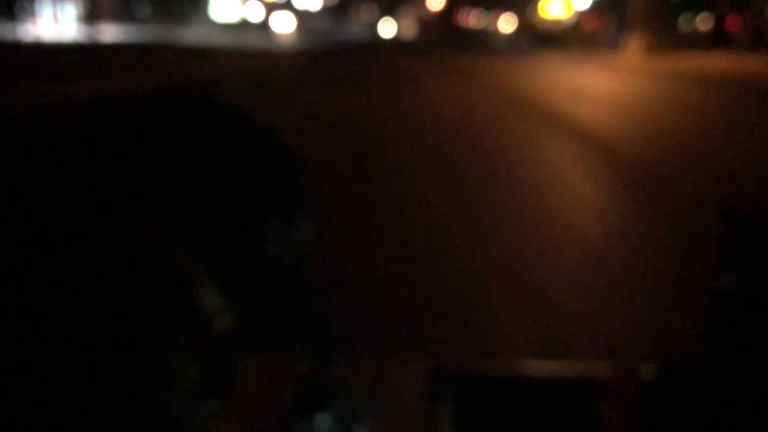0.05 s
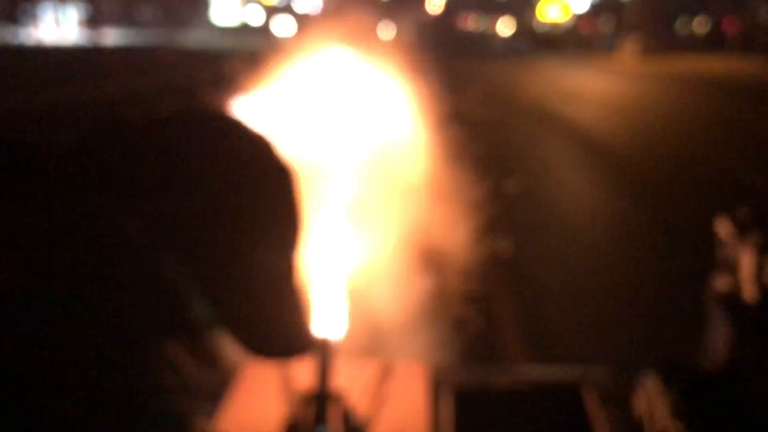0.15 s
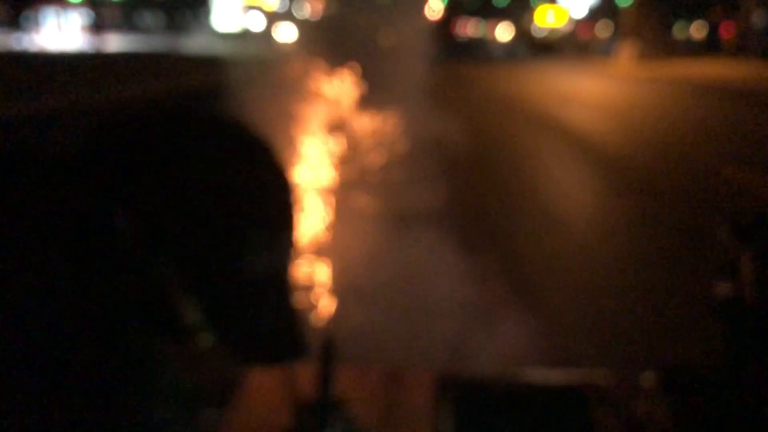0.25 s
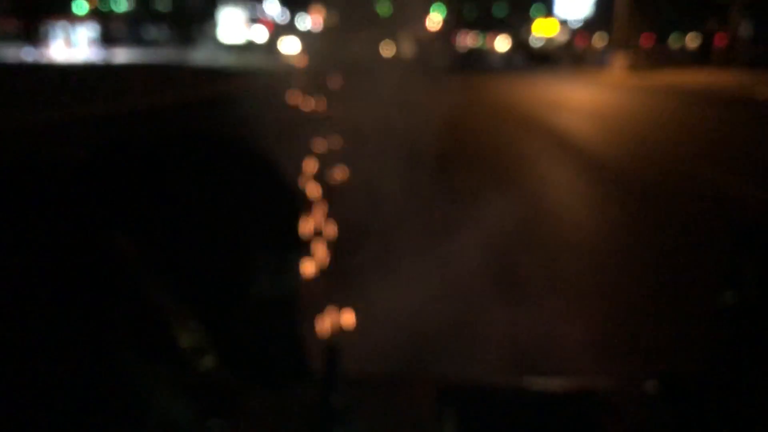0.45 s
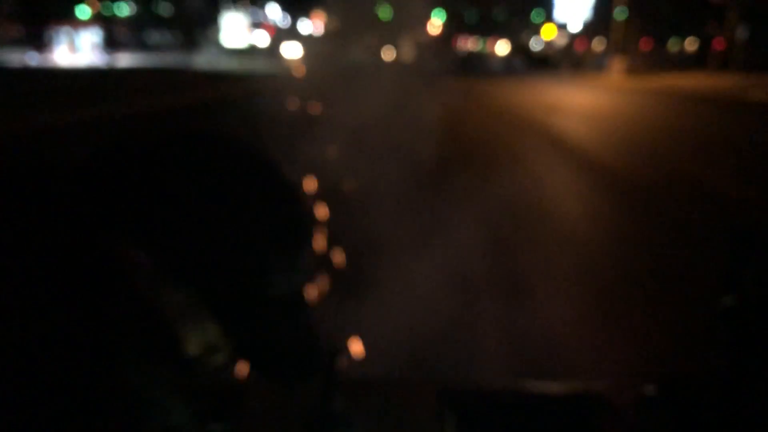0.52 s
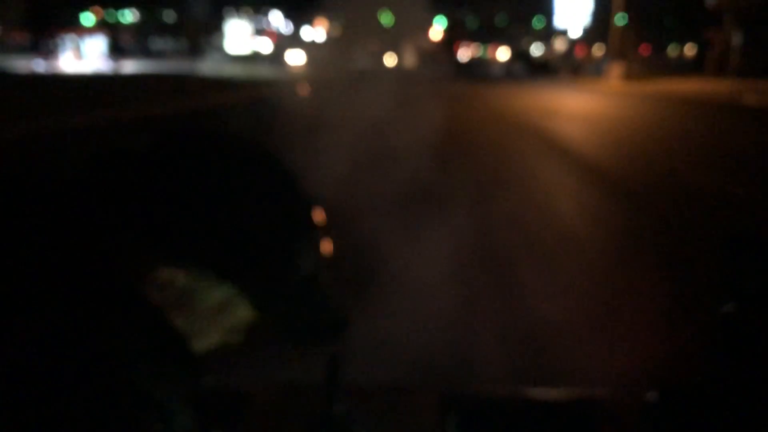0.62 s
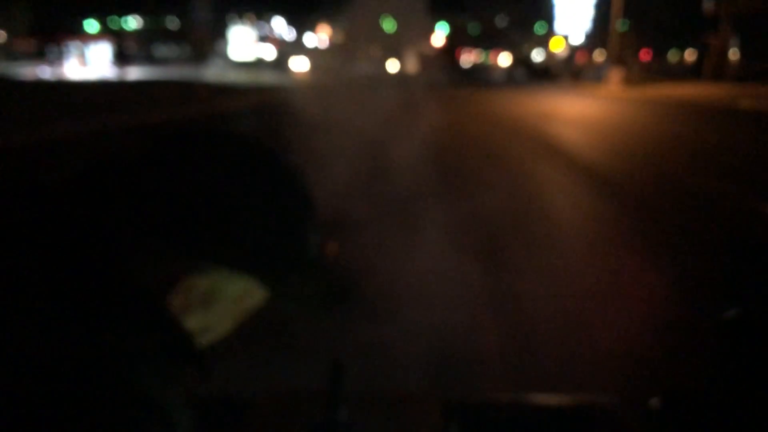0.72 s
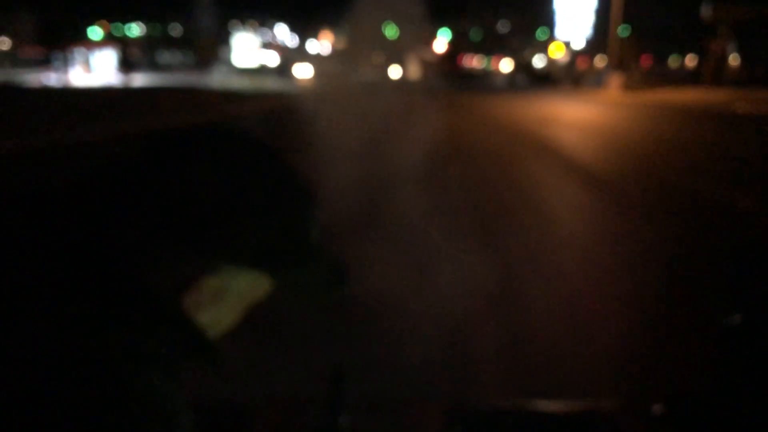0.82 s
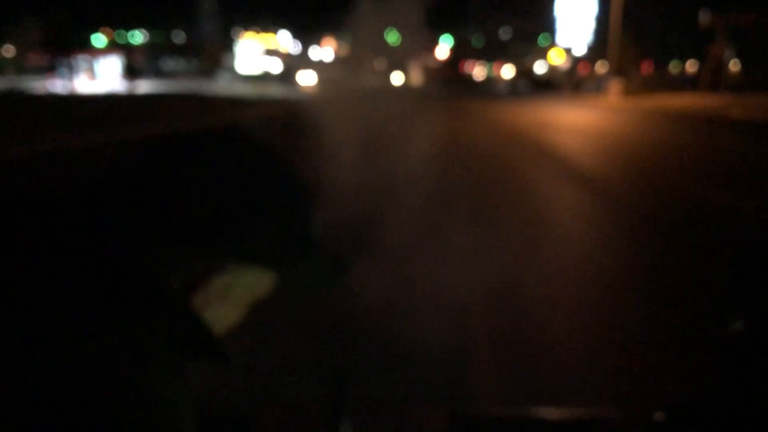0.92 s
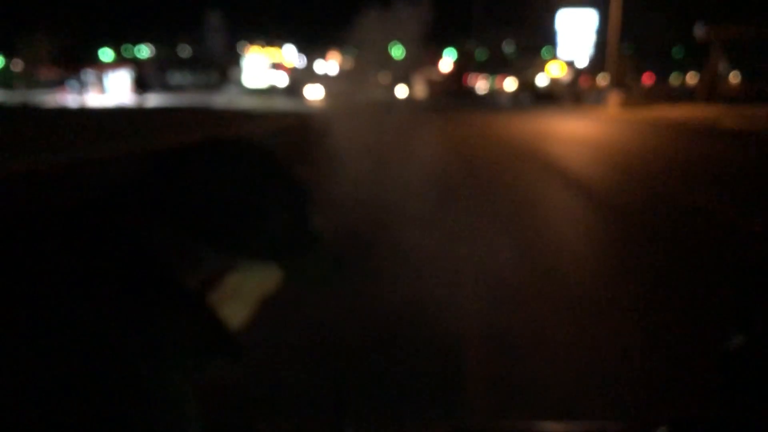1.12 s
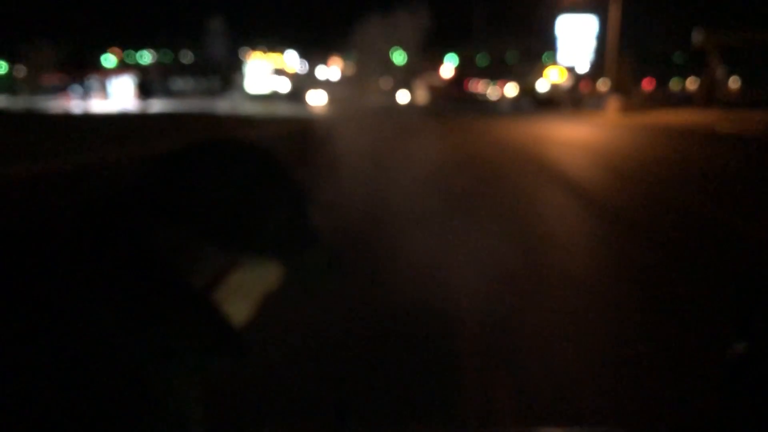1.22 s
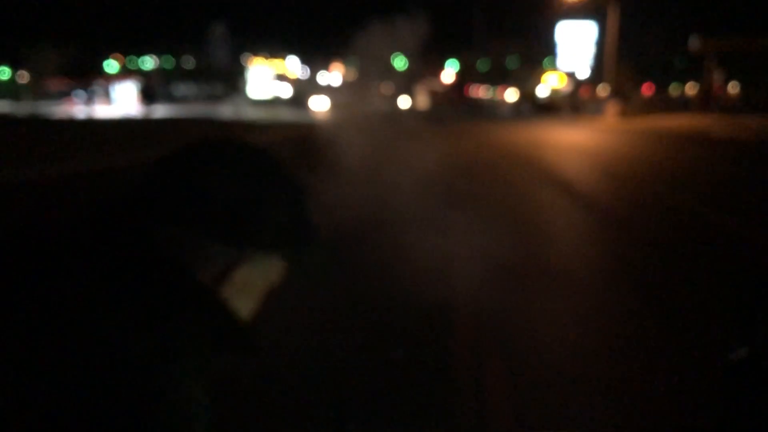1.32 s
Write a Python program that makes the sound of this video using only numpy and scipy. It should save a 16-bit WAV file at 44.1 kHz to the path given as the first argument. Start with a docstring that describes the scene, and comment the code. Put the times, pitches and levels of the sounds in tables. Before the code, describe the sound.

A small cannon fires one loud, close blast outdoors at night, with crackling echoes and rumble.

```python
"""A small black-powder cannon fires upward over open ground at night, close to the microphone.
Shaped noise makes its flare, roar and crack, and the jet of flame that hisses out with popping grains.
Buildings near and far send back sharp slaps (filtered clicks), a crackle and a rolling rumble (noise swells),
over the noise hum of a distant town. Low notes lag the high ones, so every slap is a quick downward chirp."""
import sys
import numpy as np
from scipy import signal
from scipy.fft import rfft, irfft
from scipy.io import wavfile

SR = 44100
rng = np.random.default_rng(int(sys.argv[2]) if len(sys.argv) > 2 else 0)


def transcribe(u):
    """Save the signal u as a 16-bit wav file named by the first command-line argument.

    u: samples, shape (n,) or (channels, n), limited to [-1, 1]; the rate is SR.
    q: integer samples, one column per channel.
    """
    v = np.clip(np.atleast_2d(u).T, -1, 1)
    q = np.round(v * 32767).astype(np.int16)
    wavfile.write(sys.argv[1], SR, q)


N = 59535  # length [samples]

# Noise spectrum of the distant town: (frequency [Hz], level [dB per Hz])
TOWN_SPECTRUM = [(25, -30.5), (60, 2.5), (110, 1), (210, -3.5), (330, -14), (550, -11.5), (850, -19),
                 (1400, -20), (2200, -35), (4000, -46.5), (8000, -67), (16000, -78)]
# Noise spectra of the flame, its hiss and its boom: (frequency [Hz], level [dB per Hz])
JET_SPECTRUM = [(300, -15), (1500, -15.5), (3000, -13.5), (5000, 1), (8000, 0.5), (12000, -1.5), (16000, 1)]
BOOM_SPECTRUM = [(25, -43), (45, -16), (64, 0.5), (100, 1), (160, 3.5), (280, 1), (400, -21), (600, -5.5),
                 (850, -14), (1250, -17.5), (2000, -20), (4000, -26.5), (10000, -55)]
# Noise spectra of the charge, its roar and its crack: (frequency [Hz], level [dB per Hz])
ROAR_SPECTRUM = [(100, -30.5), (300, -6.5), (450, -2.5), (650, 6.5), (800, -7.5), (1000, -4.5),
                 (1250, -7.5), (1600, 1.5), (2200, -8.5), (3050, -8.5), (3600, -39), (8000, -57.5)]
CRACK_SPECTRUM = [(200, -25.5), (1000, 1.5), (2500, 0.5), (4500, 0.5), (6500, 0), (8500, -6), (11000, -3),
                  (16000, -12.5)]
# Filter that turns one click into the thump: (frequency [Hz], gain [dB])
THUMP_RESPONSE = [(25, 14), (55, 27.5), (90, 24), (200, 24), (450, 31), (700, 22.5), (1200, 19.5),
                  (4000, -6)]
# Spectrum of the popping powder grains: (frequency [Hz], level [dB per Hz])
EMBER_SPECTRUM = [(200, -9.5), (600, 1.5), (1200, -3), (2500, -12), (5000, -18.5), (12000, -29)]
# Filter shared by every slap off a building: (frequency [Hz], gain [dB])
SLAP_RESPONSE = [(25, -5.5), (70, 28), (130, 37), (250, 42), (550, 38.5), (950, 21.5), (1450, 26.5),
                 (2200, 27.5), (3200, 27.5), (5000, 25.5), (9000, 19.5), (16000, 7.5)]
# Centres of the bass, middle and treble bands of a slap: (frequency [Hz])
SLAP_CENTRES_HZ = [320, 1213, 10200]
# Slaps from buildings: (time [s], middle gain [dB], bass gain [dB], treble gain [dB],
# favoured frequency [Hz], smear relative to click [dB])
BUILDING_ECHOES = [(0.2716, -20.5, -45, -59, 980, -11), (0.2861, -25.5, -21, -70, 990, -8),
                   (0.301, -32.5, -21, -43, 1170, 0), (0.3623, -23, -41, -46, 1110, 0),
                   (0.383, -31.5, -45, -35.5, 2640, 3), (0.3946, -33, -41, -44, 1780, -1),
                   (0.4094, -31, -51.5, -49, 1110, -1), (0.4214, -42, -31.5, -31.5, 1230, 18),
                   (0.4251, -20.5, -33.5, -65, 1340, 4), (0.4388, -35.5, -38, -53, 3140, -6),
                   (0.474, -41, -59, -59, 1310, -14), (0.4995, -56, -35, -40, 1780, -3),
                   (0.5037, -32, -26.5, -54, 1280, -10.5), (0.5134, -37, -20.5, -43, 1300, -8),
                   (0.5332, -31, -25.5, -48, 2550, -1), (0.5511, -48, -28, -52, 2380, 26),
                   (0.595, -39, -40.5, -55, 1590, 0), (0.6126, -34.5, -37, -57, 1210, 1),
                   (0.6475, -28, -91, -49, 1130, -1.5), (0.7008, -32.5, -36.5, -53.5, 1000, -1.5),
                   (0.7065, -37, -35, -47.5, 1280, -4), (0.7405, -42.5, -54, -49.5, 1560, -20),
                   (0.8006, -40.5, -32.5, -66, 1540, -16), (0.8367, -41, -35.5, -73, 1640, -14),
                   (0.9329, -25, -28, -54, 1514, -6), (1.0585, -40, -47.5, -77.5, 1270, -5.5),
                   (1.0825, -46, -45.5, -81, 1130, -1.5), (1.11, -38.5, -51.5, -93, 1334, -7.5),
                   (1.1361, -30.5, -79, -74, 1130, -1), (1.1512, -37, -73, -79, 1585, 1.5),
                   (1.1653, -36, -65, -85, 1190, 0), (1.216, -40, -65, -81, 1284, 7),
                   (1.2637, -52.5, -48.5, -77.5, 1540, 3.5), (1.3288, -38, -53.5, -77, 1090, -8)]
# Spectrum of the small scattered reflections: (frequency [Hz], level [dB per Hz])
SCATTER_SPECTRUM = [(60, -6), (250, 4.5), (500, -9.5), (850, -12.5), (1400, -6), (2200, -13), (3200, -14.5),
                    (5000, -25.5), (8000, -28.5), (12000, -40.5), (16000, -28)]
# How fast the scattered reflections die, band by band: (band centre [Hz], fall [dB per s])
SCATTER_DECAY = [(100, 12), (500, 5), (1500, 11), (3500, 20), (7000, 42.5), (14000, 58)]
# Noise spectra from far blocks, low body, grainy top and last rumble: (frequency [Hz], level [dB per Hz])
ROLL_SPECTRUM = [(60, -35), (150, 1), (230, 3), (340, 1), (450, -11), (600, -5.5), (900, -37), (3000, -68)]
SIZZLE_SPECTRUM = [(700, -23), (1400, 11), (2200, -3), (3000, 4), (4200, -9), (6000, -16), (9000, -27),
                   (16000, -36)]
RUMBLE_SPECTRUM = [(25, -36), (45, -8), (65, 17), (90, 9), (140, -5), (300, -21), (1000, -72)]
# Long low echoes from far blocks: (time [s], hold [s], low body level [dB], sizzle level [dB])
FAR_ROLLS = [(0.521, 0.039, -39.5, -54.5), (.695, 0.023, -41.5, -51.5), (0.787, 0.028, -46.5, -53.5),
             (.845, 0.021, -39.5, -70), (0.889, 0.044, -38, -55.5), (1.095, 0.0086, -41, -65)]

# RISE is the e-fold time of an onset, T60 the time of a 60 dB fall
FLARE_S, ROAR_S, CRACK_S, THUMP_S = .190, 0.2007, .2112, .2238  # stages of the shot
TOWN_DB, HISS_DB = -42, -77.5
JET_DB, JET_HOLD_S, JET_T60_S = -37.5, 0.11, 0.36
JET_FLUTTER_DB, JET_FLUTTER_PER_S, JET_FLUTTER_HZ = -1, 320, 5000  # the flame sputters below this frequency
BOOM_DB, BOOM_HOLD_S, BOOM_T60_S = -29, 0.11, 0.45
SUB_HZ, SUB_DB, SUB_HOLD_S, SUB_T60_S = 64.16, -34.5, .115, 0.11
ROAR_DB, ROAR_RISE_S, ROAR_HOLD_S, ROAR_T60_S = -10, 0.0036, 0.0091, .04
SURGE_S, SURGE_DB, SURGE_HOLD_S = 0.222, -15.5, 0.0043  # a second push of gas behind the crack
CRACK_DB, CRACK_HOLD_S, CRACK_T60_S = -14.5, 0.014, 0.025
EMBER_DB, EMBERS_PER_S, EMBER_HOLD_S, EMBER_T60_S = -36.5, 230, 0.081, 0.45
FACADE_HOLD_S, FACADE_T60_S = 0.0045, 0.015  # the rough front of a building smears each slap
RING_DB, RING_OCTAVES = 10, 0.29  # each building favours one band
SCATTER_S, SCATTER_DB, SCATTER_PER_S, SCATTER_SPREAD_DB = .5, -44, 1500, 2
SCATTER_PATCHY_DB, SCATTER_PATCHES_PER_S = 1, 33  # reflections come in clumps, band by band
SIZZLE_GRAIN_DB, SIZZLE_GRAINS_PER_S = 5, 200
RUMBLE_S, RUMBLE_DB, RUMBLE_HOLD_S = 0.91, -45.5, 0.15
SPARK_S, SPARK_HZ, SPARK_OCTAVES_PER_S = .672, 12800, -8
SPARK_LENGTH_S, SPARK_WIDTH_HZ, SPARK_DB, SPARK_FLICKER_DB = 0.018, 1900, -69, 6
LAG_CYCLES, LAG_KNEE_HZ = 2.2, 15  # well above the knee, each frequency is late by this many periods
CEILING, LOW_CUT_HZ, TOP_HZ = 0.64, 37, 16000  # ceiling in full scale


def undb(db):
    """Decibels to gain."""
    return 10 ** (np.asarray(db) / 20)


def along(hz, points):
    """Read a table of (frequency [Hz], value) on a log-frequency axis."""
    f, v = np.array(points, float).T
    return np.interp(np.log(hz + 1e-9), np.log(f), v)


def bins():
    """Frequencies of the padded spectrum [Hz]."""
    return np.arange(N + 1) * SR / (2 * N)


def filtered(x, response):
    """Apply a frequency response, with the sound mirrored at its end."""
    mirrored = np.concatenate([x, x[::-1]])
    return irfft(rfft(mirrored) * response)[:N]


def coloured(x, spectrum):
    """Give a sound a spectrum and an rms of 1."""
    y = filtered(x, undb(along(bins(), spectrum)))
    return y / np.sqrt(np.mean(y ** 2))


def noise(spectrum):
    """Turbulent noise of rms 1."""
    return coloured(rng.standard_normal(N), spectrum)


def envelope(start, rise, hold, t60):
    """Exponential rise up to the start, hold, exponential release."""
    t = np.arange(N) / SR - start
    onset = np.minimum(t, 0) / rise
    release = np.log(1000) * np.maximum(t - hold, 0) / t60
    return np.exp(onset - release)


def pulse(at):
    """A pressure click one sample long."""
    return 1. * (np.arange(N) == int(at * SR))


def walk(rate):
    """Smooth chance of spread 1 that changes about rate times a second."""
    y = filtered(rng.standard_normal(N), np.exp(-(bins() / rate) ** 2))
    return y / y.std()


def town():
    """Low hum of distant streets; it sinks a little after the shot, its faint hiss most of all."""
    hum = undb(TOWN_DB) * noise(TOWN_SPECTRUM)
    hiss = undb(HISS_DB) * rng.standard_normal(N)
    return hum * envelope(0, .01, CRACK_S, 10.2) + hiss * envelope(0, .01, CRACK_S, 3.5)


def flame():
    """Burning gas hisses and sputters out of the muzzle over a low boom and a deep throb."""
    gas = noise(JET_SPECTRUM)
    low = filtered(gas, 1 / (1 + (bins() / JET_FLUTTER_HZ) ** 4))
    sputter = undb(JET_FLUTTER_DB * walk(JET_FLUTTER_PER_S))
    sputter_rms = np.sqrt(np.mean(sputter ** 2))
    sputtering = gas - low + low * sputter / sputter_rms
    jet = sputtering * envelope(FLARE_S, .0005, JET_HOLD_S, JET_T60_S)
    boom = noise(BOOM_SPECTRUM) * envelope(THUMP_S, 0.018, BOOM_HOLD_S, BOOM_T60_S)
    cycles = np.cumsum(SUB_HZ * (1 + .08 * walk(12))) / SR  # the pitch wavers
    tone = np.sqrt(2) * np.sin(2 * np.pi * cycles)
    throb = tone * envelope(THUMP_S, .006, SUB_HOLD_S, SUB_T60_S)
    return undb(JET_DB) * jet + undb(BOOM_DB) * boom + undb(SUB_DB) * throb


def shot():
    """The charge roars up, breaks into a white crack, surges once more and ends in a low thump."""
    first_push = undb(ROAR_DB) * envelope(ROAR_S, ROAR_RISE_S, ROAR_HOLD_S, ROAR_T60_S)
    surge = undb(SURGE_DB) * envelope(SURGE_S, .002, SURGE_HOLD_S, ROAR_T60_S)
    roar = (first_push + surge) * np.tanh(noise(ROAR_SPECTRUM) / 2) * 2  # peaks rounded
    crack_swell = envelope(CRACK_S, 0.00017, CRACK_HOLD_S, CRACK_T60_S)
    crack = undb(CRACK_DB) * noise(CRACK_SPECTRUM) * crack_swell
    thump = filtered(pulse(THUMP_S), undb(along(bins(), THUMP_RESPONSE)))
    return roar + crack + thump


def embers():
    """Grains of powder pop in the flame, as random clicks of either sign."""
    happens = rng.random(N) < EMBERS_PER_S / SR
    pops = happens * rng.choice([-1, 1], N) * rng.uniform(.5, 1, N)
    fade = envelope(THUMP_S, .006, EMBER_HOLD_S, EMBER_T60_S)
    return undb(EMBER_DB) * coloured(pops, EMBER_SPECTRUM) * fade


def slaps():
    """Each building returns the shock as a click with a short smear and a colour of its own."""
    out, hz = np.zeros(N), bins()
    colour = along(hz, SLAP_RESPONSE)
    for at, middle_db, bass_db, treble_db, ring_hz, smear_db in BUILDING_ECHOES:
        smear = rng.standard_normal(N) * envelope(at, 0.00013, FACADE_HOLD_S, FACADE_T60_S)
        smear /= np.sqrt(np.sum(smear ** 2))
        # click and smear share one unit of energy
        click = (pulse(at) + undb(smear_db) * smear) / np.hypot(1, undb(smear_db))
        ring = RING_DB * np.exp(-(np.log2((hz + 1) / ring_hz) / RING_OCTAVES) ** 2)
        balance = along(hz, list(zip(SLAP_CENTRES_HZ, (bass_db, middle_db, treble_db))))
        out += filtered(click, undb(colour + ring + balance))
    return out


def scatter():
    """Countless small reflections crackle on, duller the farther they have travelled."""
    spread = SCATTER_SPREAD_DB * np.minimum(rng.exponential(size=N), 5)
    sizes = undb(spread) * rng.choice([-1, 1], N)
    clicks = coloured(sizes * (rng.random(N) < SCATTER_PER_S / SR), SCATTER_SPECTRUM)
    age = np.maximum(np.arange(N) / SR - SCATTER_S, 0)
    centres, falls = np.array(SCATTER_DECAY).T
    out = np.zeros(N)
    for share, fall in zip(np.eye(len(falls)), falls):  # overlapping bands that add up to the whole
        band = filtered(clicks, along(bins(), list(zip(centres, share))))
        patches_db = SCATTER_PATCHY_DB * walk(SCATTER_PATCHES_PER_S)
        out += band * undb(patches_db - fall * age)
    return undb(SCATTER_DB) * out * envelope(SCATTER_S, 0.0054, N / SR, 1)


def thunder():
    """Far blocks roll the shot back in low swells with a grainy sizzle on top; the deepest rumble comes late."""
    body = noise(ROLL_SPECTRUM)
    grain = undb(SIZZLE_GRAIN_DB * walk(SIZZLE_GRAINS_PER_S))
    sizzle = coloured(rng.standard_normal(N) * grain, SIZZLE_SPECTRUM)
    rolls = np.zeros(N)
    for at, hold, body_db, sizzle_db in FAR_ROLLS:
        mix = undb(body_db) * body + undb(sizzle_db) * sizzle
        rolls += mix * envelope(at, .01, hold, 0.16)
    rumble = noise(RUMBLE_SPECTRUM) * envelope(RUMBLE_S, 0.053, RUMBLE_HOLD_S, 1.8)
    return rolls + undb(RUMBLE_DB) * rumble


def spark():
    """A thin hiss, likely a flying spark, falls in pitch as it passes: narrow noise on a gliding sine."""
    since = np.clip(np.arange(N) / SR - SPARK_S, -.02, .15)
    hz = SPARK_HZ * 2 ** (SPARK_OCTAVES_PER_S * since)
    hiss = walk(SPARK_WIDTH_HZ / 2) * np.sin(2 * np.pi * np.cumsum(hz) / SR)
    flicker = undb(SPARK_DB + SPARK_FLICKER_DB * walk(50))
    return flicker * hiss * envelope(SPARK_S, 0.01, SPARK_LENGTH_S, 0.59)


def scene():
    """The shot, its echoes and the town, in one channel."""
    near = shot() + flame() + embers()
    returned = slaps() + scatter()
    return (near + returned + spark() + thunder() + town())[None]


def record(dry):
    """The recorder delays low notes more than high ones, drops the deepest bass, rounds peaks and cuts the top."""
    bass_cut = 1 / np.sqrt(1 + (LOW_CUT_HZ / (bins() + 1)) ** 8)
    lag = np.exp(-2j * np.pi * LAG_CYCLES * np.log(1 + bins() / LAG_KNEE_HZ))
    late = filtered(dry[0], bass_cut * lag)
    rounded = CEILING * np.tanh(late / CEILING)
    top_cut = signal.ellip(12, .1, 80, TOP_HZ, fs=SR, output="sos")
    return signal.sosfilt(top_cut, rounded)[None]


dry = scene()
out = record(dry)
transcribe(out)
```